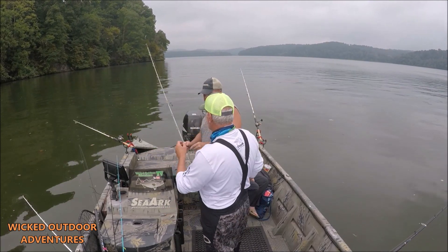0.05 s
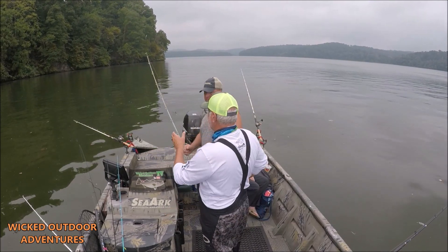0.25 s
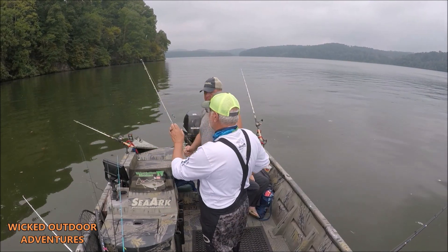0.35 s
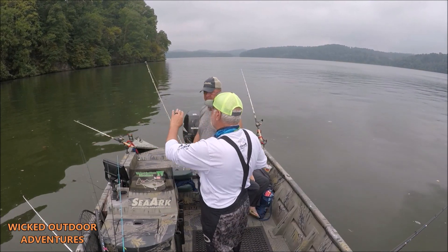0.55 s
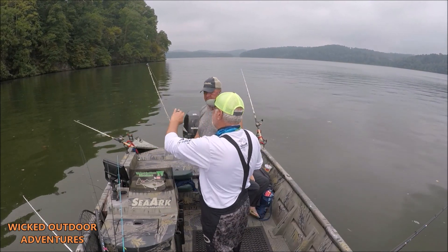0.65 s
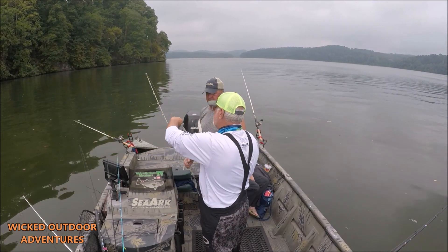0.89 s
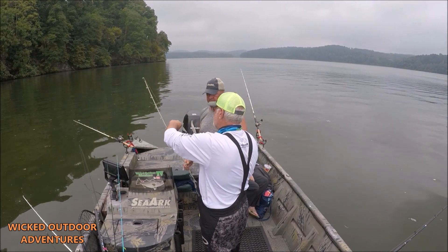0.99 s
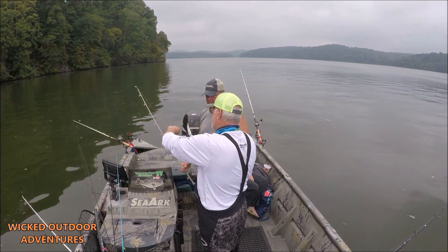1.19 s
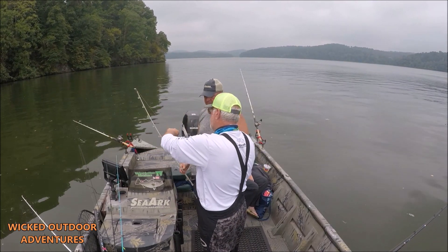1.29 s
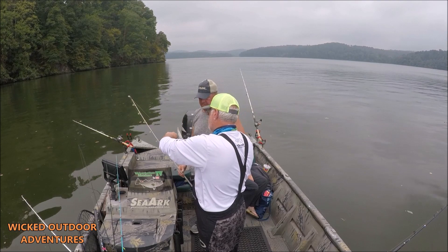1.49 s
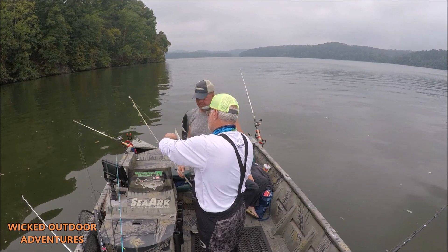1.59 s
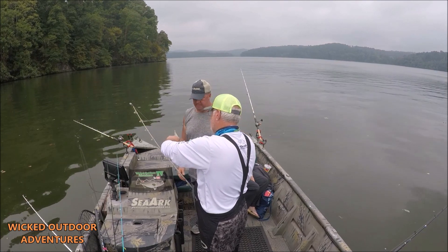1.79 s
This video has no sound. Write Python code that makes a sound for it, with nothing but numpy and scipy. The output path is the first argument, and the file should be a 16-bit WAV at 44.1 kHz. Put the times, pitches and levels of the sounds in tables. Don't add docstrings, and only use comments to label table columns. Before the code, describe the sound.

Loose gear bumps softly against a thin aluminum boat, then a hard double-edged knock rattles and rings briefly; quieter bumps lead to another blow and fading nudges, close stereo pickup, little bass, steady faint hiss.

```python
import sys
import numpy as np
from scipy import signal
from scipy.fft import rfft, irfft
from scipy.io import wavfile

SR = 44100
rng = np.random.default_rng(int(sys.argv[2]) if len(sys.argv) > 2 else 0)


def dump(signal):
    limited = np.clip(np.atleast_2d(signal).T, -1, 1)
    pcm = np.round(limited * 32767).astype(np.int16)
    wavfile.write(sys.argv[1], SR, pcm)


def invert_db(level):
    return 10 ** (np.asarray(level, dtype=float) / 20)


N = 81585


def curve(table, at):
    return np.interp(at, *np.array(table, float)[:, :2].T)


def band(x, hz, width):
    return signal.lfilter(*signal.iirpeak(hz, hz / width, fs=SR), x)


def unit(x):
    return x / np.sqrt(np.mean(x ** 2))


def push(x, ms):
    w = np.hanning(int(max(ms, 0.1) * SR / 1000) + 3)
    return np.convolve(x, w / w.sum())[:len(x)]


def ports_from(mid, side):
    return np.array([mid + side, mid - side])


# pitch in Hz, level in dB, t60 in seconds, side over mid in dB, side lead in radians.
HULL_MODES = [(133.2, -7.5, 0.319, 1, 1), (150, -11.5, 0.59, -2.5, 0.76), (172.3, 4, 0.12, -5, 1),
              (181, 4.5, 0.049, -23, 0.66), (217, 1, 0.29, -4, 1), (252.4, -10, 0.47, -5, 0.39),
              (268, 0, 0.28, 2.5, 0.76), (288.9, -8.5, 0.54, 2, 0.41), (303.2, -4.5, 0.59, 3.5, 0.24),
              (340, -2.5, 0.13, 6, 0.56), (380.8, -7.5, 0.38, 13, 0.19), (407.4, -9, 0.31, 2.5, 0.84),
              (451, -11, 0.39, 8, 0.49)]
MOUNT_MODES = [(510, -9, 0.07, -9, 0.36), (553, -8, 0.14, -20, 0.35), (600, -7, 0.077, 12.5, 0.24),
               (650, -18, 0.21, 23, 0.069), (700, -8.5, 0.076, 11.5, 0.29), (787, -10, 0.1, 16.5, 0.33),
               (859.8, -10.5, 0.12, -10, 0.15), (1058, -4.5, 0.042, 16, 0.27), (1220, -17, 0.11, 14, 0.34),
               (1190, -46, 0.054, 26, 0.75), (1640, -45, 0.02, 3, .4), (1860, -33.5, 0.049, -4, .4)]
TWIN_SPLIT, TWIN_DB, TWIN_TURN = 0.0246, -1.5, 1


def plate():
    modes = HULL_MODES + MOUNT_MODES
    twins = []
    for k, (hz, db, t60, side_db, lead) in enumerate(modes):
        turn = TWIN_TURN * (-1) ** k
        twins.append((hz * (1 + TWIN_SPLIT), db + TWIN_DB, t60, side_db, lead + turn))
    return modes + twins


# start in seconds, level in dB, push in ms, chatter in ms, best-rung pitch in Hz.
KNOCKS = [(0.231, -43, 4.6, 6.5, 186), (.238, -27.5, 1.9, 11.4, 340), (0.248, -33, 1.1, 13, 220),
          (0.253, -22, 1.02, 19, 600), (0.265, -28, 1.9, 8.6, 600), (0.284, -31, 0.75, 9.6, 700),
          (0.298, -27, 1.73, 9.4, 258), (.318, -30, 1.5, 7.6, 304), (0.349, -32.5, 1.2, 26, 567),
          (.361, -34, 0.54, 1.3, 190), (.372, -31.5, 0.665, 9, 550), (0.404, -36, 1.15, 39, 277),
          (0.437, -36.5, 1.8, 7.7, 168), (1.156, -23.5, 6, 4.5, 156), (1.165, -28, 1.2, 15.4, 199),
          (1.174, -23.5, 0.8, 9.8, 650), (1.19, -42, 0.75, 10, 650), (1.207, -27.5, 1.23, 24, 243),
          (1.240, -25, 3.2, 25, 238), (1.262, -35.5, 2, 9.9, 140), (1.277, -38.5, 1.9, 3.3, 214),
          (1.348, -35, 3.3, 20, 249), (1.377, -44, 2.6, 22, 143)]
# start in seconds, level in dB, best-rung pitch in Hz.
NUDGES = [(.001, -51.5, 191), (.025, -45, 167), (0.125, -51, 184), (0.177, -55, 192), (0.506, -39, 262),
          (0.531, -43.5, 367), (0.568, -42, 149), (.635, -39.5, 179), (0.671, -40, 286), (0.735, -44, 150),
          (0.791, -36, 299), (0.834, -41, 306), (0.863, -40, 310), (0.908, -41.5, 315), (.940, -41, 410),
          (0.951, -46.5, 150), (1.046, -48, 162), (1.301, -32, 367), (1.42, -48, 148), (1.455, -41.5, 289),
          (1.51, -37, 150), (1.553, -40, 189), (1.580, -35.5, 320), (1.61, -42, 182), (1.652, -39, 269),
          (1.693, -46, 175), (1.739, -43.5, 285), (1.77, -40, 323), (1.819, -51, 295)]
NUDGE_PUSH_MS, NUDGE_CHATTER_MS = 2.6, 3.3
BLOW_DB = -6
SCATTER_DB, FAVOUR_DB, FAVOUR_OCT = 1.5, 10.5, 0.39
FLIP_SHARE, FLIP_MOUNT = 0.3, 0.5


def blows(modes):
    hz = np.array(modes)[:, 0]
    span = 4096
    force = np.zeros((len(hz), N))
    t = np.arange(span) / SR
    flip_chance = np.where(hz < MOUNT_MODES[0][0], FLIP_SHARE, FLIP_MOUNT)
    nudges = [(s, db, NUDGE_PUSH_MS, NUDGE_CHATTER_MS, best) for s, db, best in NUDGES]
    for s, db, push_ms, chatter_ms, best in KNOCKS + nudges:
        contacts = rng.random(span) < 0.012
        hits = rng.standard_normal(span) * contacts * np.exp(-t * 1000 / max(chatter_ms, 1))
        hits[0] = 2.3
        favour = FAVOUR_DB * (np.exp(-(np.log2(hz / best) / FAVOUR_OCT) ** 2) - 1)
        sign = np.where(rng.random(len(hz)) < flip_chance, -1, 1)
        weight = invert_db(favour + SCATTER_DB * rng.standard_normal(len(hz))) * sign
        i = int(s * SR)
        x = (push(hits, push_ms) / np.sqrt(np.sum(hits ** 2)))[:N - i]
        force[:, i:i + len(x)] += invert_db(db + BLOW_DB) * np.outer(weight, x)
    return force


def ring(force, modes):
    out = np.zeros((2, N))
    for x, (hz, db, t60, side_db, lead) in zip(force, modes):
        decay = np.log(1000) / (max(t60, 0.02) * SR)
        pole = np.exp(2j * np.pi * hz / SR - decay)
        z = invert_db(db) * signal.lfilter([1], [1, -pole], x + 0j)
        out += [z.imag, invert_db(side_db) * (z * np.exp(1j * lead)).imag]
    return out


# peak in seconds as heard through the slow bass cut, level in dB, pitch in Hz, side over mid in dB.
THUMPS = [(0.252, -21, 203.6, -20), (0.254, -38.5, 340, 16), (.258, -49, 600, 25), (.271, -25, 294, -9),
          (.275, -27, 275, 2), (.29, -49, 700, 16), (0.311, -40, 300, 2), (0.322, -25.5, 275, -14),
          (0.327, -30.5, 170, -16), (.366, -26.5, 179, -7), (.385, -42, 547, 10), (.407, -33.5, 238, -7),
          (.42, -35, 313, 7.5), (.434, -29, 290, -9), (.441, -32, 170, -8), (1.172, -22.5, 196.6, -12),
          (1.17, -48, 280, 21), (1.183, -35.5, 400, 8), (1.19, -57, 700, 16), (1.208, -27.5, 235, -3),
          (1.212, -36, 366, 5), (1.223, -30, 250, 6), (1.236, -35.5, 298, -6), (1.273, -26, 152, -1),
          (1.29, -37, 267, 7), (1.303, -31.5, 154, 1), (1.382, -54, 300, 8), (1.392, -33, 150, -10),
          (1.429, -37.5, 150, -7), (.031, -45, 163.8, -6), (0.133, -45.5, 182, -1), (0.746, -33.5, 150, -5),
          (0.846, -35.5, 192, -14), (0.951, -43, 168, -17), (1.053, -47, 170, -16), (1.333, -54, 139, -13),
          (1.355, -43, 216, -6), (1.515, -36, 161, -6), (1.563, -36, 183, -3), (1.658, -40, 230, -13),
          (.258, -44, 859, -3), (1.175, -45, 812, -3), (.516, -38, 270, -10), (.58, -41.5, 155, -6),
          (.81, -46.5, 304, -4), (.885, -50, 418, -3), (0.919, -47.5, 294, -1), (1.62, -49, 161, -6),
          (1.19, -38.5, 374, -2)]
THUMP_RISE_MS, THUMP_FALL_MS, THUMP_LEAD = 7.3, 8.6, 0.99
THUMP_EARLY_MS, THUMP_EARLY_HZ = 6, 200


def thumps(t):
    out = np.zeros((2, N))
    for s, db, hz, side_db in THUMPS:
        near = slice(int(s * SR) - 2048, int(s * SR) + 2048)
        age = t[near] - s + THUMP_EARLY_MS / 1000 * (THUMP_EARLY_HZ / hz) ** 1.5
        length_ms = np.where(age < 0, THUMP_RISE_MS, THUMP_FALL_MS)
        swell = invert_db(db) * np.exp(-(age * 1000 / length_ms) ** 2)
        turn = 2 * np.pi * (hz * age + rng.random())
        out[:, near] += [swell * np.sin(turn), invert_db(side_db) * swell * np.sin(turn + THUMP_LEAD)]
    return out


# start in seconds, level in dB, t60 in seconds, top in Hz.
CRACKS = [
    (0.241, -35.5, 0.012, 2900),
    (0.244, -41, 0.07, 7000),
    (0.26, -56, 0.07, 6500),
    (0.358, -48, 0.06, 5700),
    (0.538, -55, 0.055, 4120),
    (1.166, -53.5, 0.19, 5500),
    (1.19, -55, 0.11, 2480),
    (1.165, -39.5, 0.018, 3570),
]
# centre in Hz, width in Hz, level in dB.
CRACK_BODY = [(874, 113, 5), (1110, 187, 3), (1560, 134, 6.5), (1747, 71, -1), (2400, 220, -25),
              (3040, 210, -12), (3700, 150, -2), (4020, 63, -11), (4940, 360, -22), (5740, 810, -25),
              (2610, 1300, -20.5)]
CRACK_SIDE_DB = -1.5


def cracks(t):
    grit = rng.standard_normal((2, N))
    noise = np.zeros((2, N))
    for s, db, t60, top_hz in CRACKS:
        attack = np.clip((t - s) / 0.0023, 0, 1)
        burst = grit * invert_db(db - 60 * np.clip(t - s, 0, 1) / t60) * attack
        noise += signal.sosfilt(signal.butter(4, top_hz, fs=SR, output="sos"), burst)
    body = sum(invert_db(db) * band(noise, hz, width) for hz, width, db in CRACK_BODY)
    return 4 * invert_db(np.array([[0], [CRACK_SIDE_DB]])) * body


TICK_S, TICK_MS, TICK_HZ, TICK_DB = 1.482, 3.5, 6800, -58


def tick(t):
    swell = invert_db(TICK_DB) * np.exp(-((t - TICK_S) * 1000 / TICK_MS) ** 2)
    return swell * np.sin(2 * np.pi * TICK_HZ * t) * [[1], [0.4]]


# time in seconds, level in dB.
GEAR = [(0, -52), (.22, -51.5), (.4, -42), (.6, -46), (.85, -45.5), (1.0, -50), (1.14, -48), (1.25, -46),
        (1.47, -48), (1.6, -45), (1.85, -50.5)]
GEAR_DB, GEAR_PUSH_MS = -21.5, 0.93
GEAR_PER_S, GEAR_SPREAD_DB = 400, 2.5


def gear(count, t):
    when = rng.random(N) < GEAR_PER_S / SR
    uneven = GEAR_SPREAD_DB * np.minimum(rng.exponential(size=N), 3)
    size = when * invert_db(uneven + curve(GEAR, t) + GEAR_DB)
    return np.array([push(size * rng.standard_normal(N), GEAR_PUSH_MS) for _ in range(count)])


# time in seconds, level in dB.
SWAY = [
    (0.0, -62),
    (0.18, -80.5),
    (0.262, -58),
    (0.412, -71.5),
    (1.144, -71),
    (1.21, -57),
    (1.54, -73.5),
    (1.56, -66),
    (1.85, -76),
]
SWAY_HZ, SWAY_WIDTH_HZ, SWAY_SIDE_DB = 52, 22, -7


def sway(t):
    x = rng.standard_normal((2, N))
    wobble = unit(band(x, SWAY_HZ, SWAY_WIDTH_HZ) + 0.49 * band(x, 88, 79))
    return wobble * invert_db(curve(SWAY, t)) * invert_db(np.array([[0], [SWAY_SIDE_DB]]))


# pitch in Hz, level in dB per Hz.
HISS = [(290, -33), (500, 1), (568, -14.5), (645, -6), (1350, -6.5), (4890, -17.5), (9780, -15.5),
        (12600, -25.5), (14700, -27)]
# pitch in Hz, left minus right in dB.
HISS_PAN = [(1000, -2.5), (4000, 0.5), (8000, -3.5), (12000, -1)]
HISS_DB = -60.5


def hiss():
    log_hz = np.log(np.fft.rfftfreq(N, 1 / SR) + 1)

    def shape(table):
        hz, db = np.array(table).T
        return np.interp(log_hz, np.log(hz), db)

    db = shape(HISS) + np.array([[0.5], [-0.5]]) * shape(HISS_PAN)
    return unit(irfft(rfft(rng.standard_normal((2, N))) * invert_db(db), N)) * invert_db(HISS_DB + 4.5)


BASS_CUT_HZ, BASS_LEAK_DB = 128, -32


def scene():
    t = np.arange(N) / SR
    modes = plate()
    hull = ring(blows(modes) + gear(len(modes), t), modes)
    ports = ports_from(*(hull + cracks(t) + tick(t) + thumps(t))) + hiss()
    bass_cut = signal.ellip(8, 0.5, 50, BASS_CUT_HZ, "high", fs=SR, output="sos")
    cut = signal.sosfilt(bass_cut, ports)
    return cut + invert_db(BASS_LEAK_DB) * ports + ports_from(*sway(t))


# time in seconds,
# highest pitch kept in Hz.
REACH = [(0, 14900), (.255, 14900), (.27, 12900), (.38, 14100), (.535, 14250), (.55, 14900), (1.165, 14900),
         (1.18, 12750), (1.28, 12750), (1.31, 13500), (1.39, 13150), (1.45, 14200), (1.53, 14200),
         (1.55, 13450), (1.81, 13350), (1.84, 14000)]


def treble_ceiling(x):
    hz, s, z = signal.stft(x, SR, nperseg=1024)
    return signal.istft(z * (hz[:, None] < curve(REACH, s)), SR, nperseg=1024)[1][:, :N]


def band_limit(x):
    return signal.sosfilt(signal.butter(12, 14890, fs=SR, output="sos"), x)


TOP_HZ = 14870


def record(dry):
    top_cut = signal.ellip(10, 0.2, 80, TOP_HZ, fs=SR, output="sos")
    mix = signal.sosfilt(top_cut, treble_ceiling(dry))
    return band_limit(mix)


dry = scene()
out = record(dry)
dump(out)
```